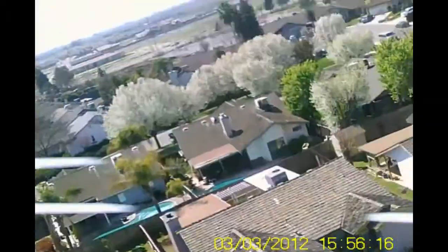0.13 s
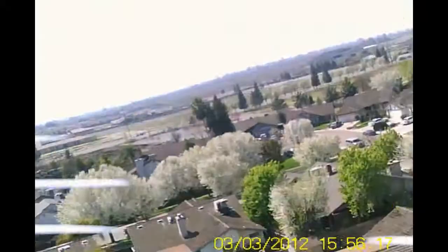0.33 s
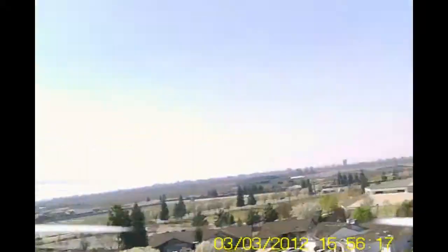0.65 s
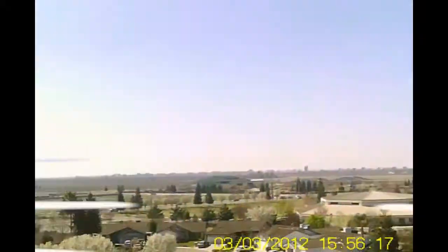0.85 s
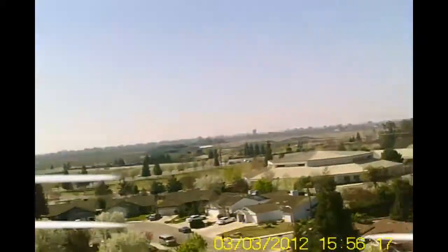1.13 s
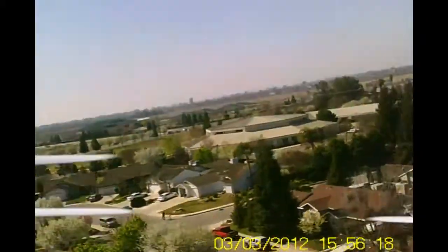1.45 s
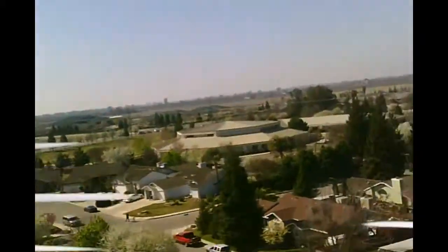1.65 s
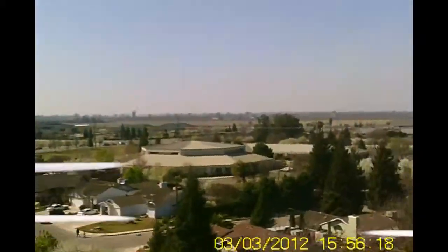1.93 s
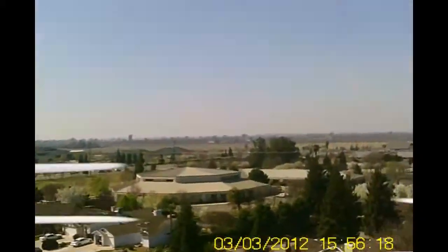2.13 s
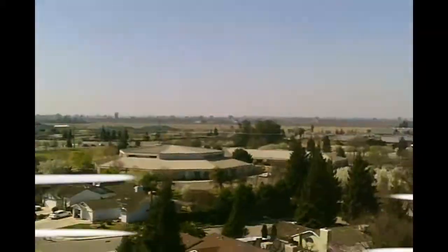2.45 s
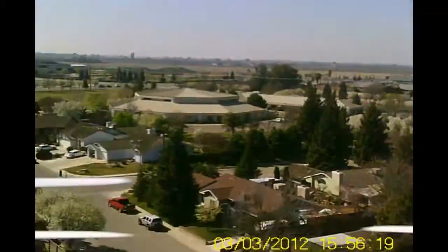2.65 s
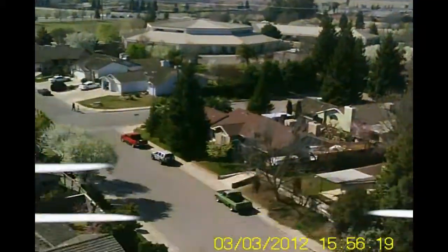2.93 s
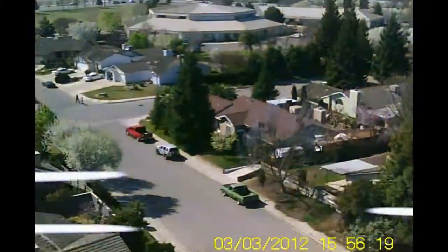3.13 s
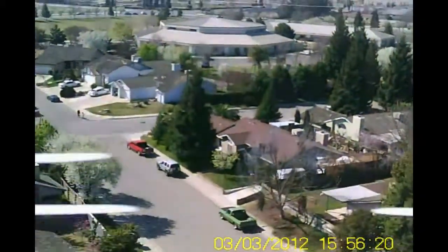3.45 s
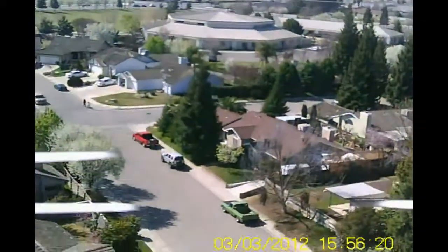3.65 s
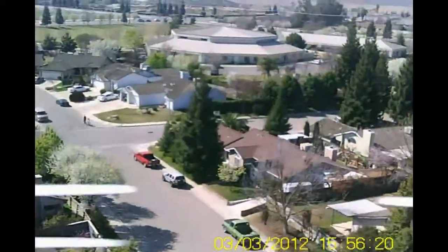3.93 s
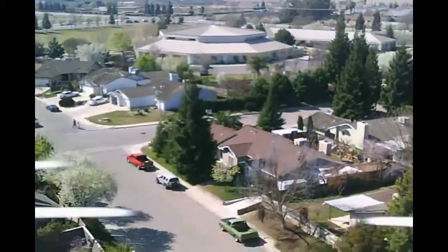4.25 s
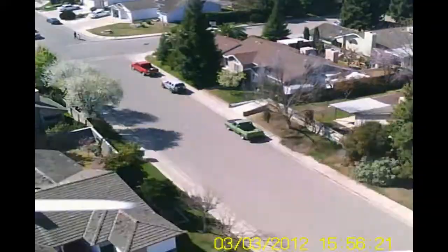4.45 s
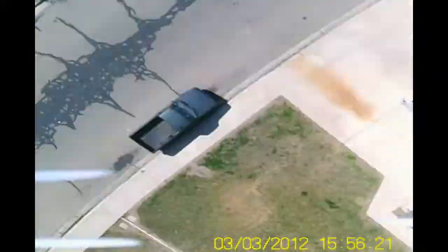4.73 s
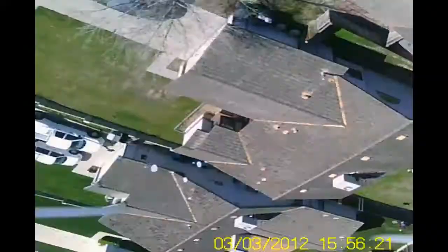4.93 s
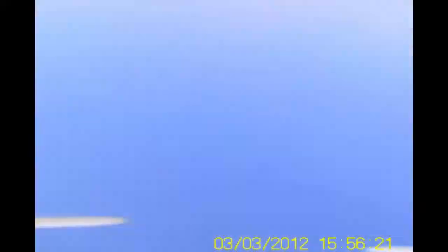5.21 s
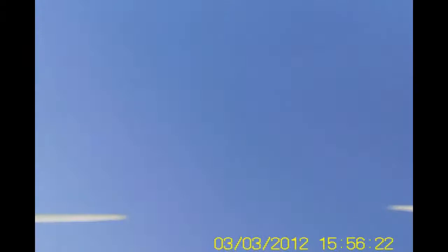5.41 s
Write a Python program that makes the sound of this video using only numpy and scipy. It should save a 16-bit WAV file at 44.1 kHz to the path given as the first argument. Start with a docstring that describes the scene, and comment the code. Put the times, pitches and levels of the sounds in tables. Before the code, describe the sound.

Outdoors, high above houses, a tiny microphone rides on a toy quadcopter, very close to one propeller. From the start a dense, nasal low buzz dominates, with fainter beating drones from the other propellers, plastic rattle, thin gear whine and rasp, brush hiss and a faint fixed high whistle. The buzz rises slightly and is brightest until about 1 second, with some low air buffeting, then eases down by 1.5 seconds. It cruises with small pitch wavers until roughly 4.2 seconds, slightly rougher after 3.3. At about 4.3 it drops abruptly, partly recovers, then sinks further towards 4.8 to 5.0, quieter, while slack gears knock and chatter. From about 5.1 the motors pull again: pitch climbs unevenly to 5.4, blade pulses flutter, strong low wind thumps the microphone, and sharp jolts crack near 5.35 and 5.45. The pitch sags again as it ends around 5.6, still running.

```python
"""A toy quadcopter heard from its own on-board camera, as periodic sources over filtered noise.
It cruises: one propeller's pressure pulses buzz past the microphone, three more thump faintly, four brushed
motors and their gears excite the plastic frame, and the speed controller whistles at its switching rate.
It then throttles back and tumbles: the buzz falls in pitch and level, and slack gears knock and rattle.
Finally it powers up again, with irregular blade pulses and disturbed air buffeting the microphone."""
import sys
import numpy as np
from scipy import signal
from scipy.fft import rfft, irfft
from scipy.io import wavfile
from scipy.ndimage import uniform_filter1d

SR = 44100
rng = np.random.default_rng(int(sys.argv[2]) if len(sys.argv) > 2 else 0)


def transcribe(signal):
    """Save signal, clipped to [-1, 1], as a 16-bit WAV file at the path in sys.argv[1]."""
    frames = np.atleast_2d(signal).T
    limited = np.clip(frames, -1, 1)
    pcm = np.round(limited * 32767).astype(np.int16)
    wavfile.write(sys.argv[1], SR, pcm)


N = 246059
T = np.arange(N) / SR  # t/s

# Buffeting of the microphone, relative spectrum: [f/Hz, level/dB]
BUFFET_SPECTRUM = [(10, -10), (45, 6), (70, -4), (110, 2.5), (160, -3), (220, -10), (340, -11.5),
                   (650, -19), (1000, -21), (2200, -20), (3200, -51), (8000, -58)]
# Swish of the blades, relative spectrum: [f/Hz, level/dB]
SWISH_SPECTRUM = [(12, 21), (25, 5.5), (50, 0), (100, -8), (300, 5.5), (550, -2.5), (720, -3), (950, -2.5),
                  (1200, -1.5), (1550, 3), (2500, -10.5), (3100, -22.5), (6000, -36)]
# Hiss of the motor brushes, relative spectrum: [f/Hz, level/dB]
BRUSH_SPECTRUM = [(2300, -39), (3100, -17.5), (4400, 3.5), (5000, -2.5), (5500, -4.5), (5950, -3.5),
                  (6600, -13), (7500, -5), (8300, -10.5), (9200, -6.5), (9900, -21), (10600, -15),
                  (11800, -30)]
# Dull body of a backlash knock, relative spectrum: [f/Hz, level/dB]
THUD_SPECTRUM = [(150, -30), (350, -4), (520, 7.5), (720, -3), (960, 4), (1400, -7.5), (2500, -16),
                 (4500, -24), (9000, -47)]
# Resonances of the plastic frame: [f/Hz, half bandwidth of each filter section/Hz, level/dB]
FRAME_MODES = [(970, 340, -9), (1791, 245, -1.5), (1962, 342, -2), (2415, 214, -7.5), (3537, 230, -10.5),
               (4057, 210, -9.5)]
# Relative loudness of the tooth mesh as it moves over the frame's resonances: [f/Hz, level/dB]
MESH_RESPONSE = [(2600, -12), (3150, -7), (3550, 8), (3900, 3), (4200, 9), (4450, 6.5), (4700, 5.5),
                 (5100, 3.5)]
# Brief jolts of the frame in the tumble and the recovery: [t/s, change of rattle level/dB]
JOLTS = [(4.627, 5), (4.666, -3), (5.336, 11), (5.442, 5), (5.479, 6)]
# Rough air in the climb, drift, tumble and recovery: [start t/s, rise t/s, start of decay t/s, strength 0-1]
GUSTS = [(-.2, .34, .8, .38), (3.2, .34, 4.3, .18), (4.45, 0.34, 5.3, 0.35), (5.07, .2, 5.31, 0.77),
         (5.08, 0.36, 5.7, 1.0)]
# Throttle: [t/s, mean blade-pass f/Hz of near and opposite propellers, motor torque level/dB]
THROTTLE = [(0, 133, 0), (.85, 136.1, -0.5), (1.5, 131.7, 0), (1.8, 136, .3), (2.45, 132, -0.9),
            (2.85, 134.9, .5), (3.6, 137, 0.67), (4.45, 126.3, 0.3), (4.72, 111, -5), (4.93, 101.5, -4.5),
            (5.06, 97.33, -1.5), (5.35, 111.3, 1), (5.58, 104, 0.5)]
# Two side propellers, trimmed against roll: [t/s, blade-pass f/Hz of one, blade-pass f/Hz of the other]
SIDE_SPEED = [(0, 131.5, 148), (.27, 134.4, 158), (.48, 135.6, 145), (.6, 146.4, 152), (.95, 136.1, 157),
              (1.3, 134.4, 147.8), (1.65, 141.2, 143), (2.2, 134, 138.2), (3.5, 139.4, 141.5),
              (3.95, 148.9, 152.5), (4.3, 150.9, 153.9), (4.5, 113, 127.1), (4.8, 113.5, 102.2),
              (5.05, 109.6, 137.9), (5.2, 113.3, 114.2), (5.58, 112.6, 122.5)]
# Nearest propeller: [t/s, blade-pass f/Hz]
NEAR_SPEED = [(0, 146), (.15, 155.6), (.4, 160.7), (.52, 152.2), (.63, 157.7), (.95, 155.5), (1.17, 148.2),
              (1.33, 138.3), (1.55, 136.4), (1.74, 140.3), (2.08, 139), (2.3, 135.8), (2.55, 136.3),
              (2.85, 140.2), (3.05, 137.3), (3.52, 141.8), (4.05, 135.7), (4.27, 133.3), (4.37, 114.8),
              (4.49, 119.7), (4.77, 86.9), (4.89, 91.16), (5.02, 82.8), (5.18, 98.94), (5.3, 104.5),
              (5.41, 119), (5.58, 103)]

SWITCH_HZ = 3982
FULL_DUTY_HZ = 174  # blade-pass rate with the controller fully on
CRUISE_HZ = 139  # reference blade-pass rate
MESH_ORDER, MOTOR_RATIO = 32, 32 / 11  # gear teeth, and motor turns, per blade pass
CALM_DB, GUST_DB = -47, 28  # buffeting in still air, and its rise in a full gust
GUST_FALL_S = 0.47
CALM_UNEVEN, GUST_UNEVEN, SLACK_UNEVEN = 0.019, .28, 0.26  # scatter of the blade passes
# Reference levels/dB; their slopes with speed (dB per octave) and torque (dB per dB); rise in a full gust/dB
BLADE_DB, BLADE_DB_PER_OCTAVE, BLADE_PER_TORQUE, BLADE_GUST_DB = -23.8, 16, 0.82, 4
RATTLE_DB, RATTLE_GUST_DB = -32, 1.5
TEETH_DB, TEETH_DB_PER_OCTAVE, TEETH_PER_TORQUE, TEETH_GUST_DB = -40, -5.5, 1.8, 2
HISS_DB, HISS_DB_PER_OCTAVE, HISS_PER_TORQUE, HISS_GUST_DB = -43.5, 6.5, 0.27, 2.5
WHISTLE_DB, WHISTLE_PER_TORQUE = -45.5, 3.5  # level at half duty
OVERTONE_DB, OVERTONE_DB_PER_OCTAVE, OVERTONE_PER_TORQUE, OVERTONE_GUST_DB = -67, -21, 1.73, 9
# Gear backlash (0-1): under load, per Hz/s of slowing, and added in a full gust; smoothing time
TIGHT_SLACK, SLACK_PER_HZ_S, GUST_SLACK, SLACK_SMOOTH_S = 0.12, 0.0039, 0.19, 0.27
COAST_DB = 5.5  # loss of pull on a motor whose gears go fully slack
HUNT, HUNT_PER_S = .005, 4  # stabiliser nudging the far propellers: share of speed, rate
STALL_HZ, STALL_DB_PER_OCTAVE = 112, 11  # below this rate the blades lose grip and the buzz fades faster
FLUTTER_DB = 7  # swell and sag of the buzz, per unit of unevenness


def undb(db):
    """Level-to-amplitude relation: decibels to gain."""
    return 10 ** (np.asarray(db) / 20)


def unit(x):
    """Normalisation to rms 1."""
    return x / np.sqrt(np.mean(x ** 2))


def curves(table):
    """Linear interpolation of each column of a time table, sample by sample."""
    t, *columns = np.transpose(table)
    return [np.interp(T, t, column) for column in columns]


def response(points, hz):
    """Frequency response: gain interpolated over log frequency."""
    f, db = np.transpose(points)
    return undb(np.interp(np.log(hz + 1), np.log(f), db))


def colour(x, points):
    """Spectral shaping in the frequency domain, to rms 1."""
    hz = np.arange(N // 2 + 1) * SR / N
    return unit(irfft(rfft(x) * response(points, hz), N))


def ring(drives, modes):
    """Modal resonance: each mode, two peaks in cascade, answers its own drive; the sum has rms 1."""
    out = 0
    for drive, (hz, width, db) in zip(drives, modes):
        b, a = signal.iirpeak(hz, hz / (2 * width), fs=SR)
        once = signal.lfilter(b, a, drive)
        out = out + undb(db) * signal.lfilter(b, a, once)
    return unit(out)


def walk(rate):
    """Band-limited random modulation: smoothed random knots, rate per second, rms 1."""
    knots = rng.standard_normal(int(rate * N / SR) + 2)
    joined = np.interp(T * rate, np.arange(len(knots)), knots)
    return unit(uniform_filter1d(joined, int(SR / rate / 2)))


def spin(hz, wobble):
    """Phase as the integral of frequency: blade-pass angle with a slightly fluttering speed."""
    turns = np.cumsum(hz * (1 + wobble * walk(40))) / SR
    return 2 * np.pi * (turns + rng.random())


def gusts():
    """Turbulence envelope, 0-1: each gust rises, holds and dies away; the strongest prevails."""
    envelopes = []
    for start, rise, end, size in GUSTS:
        shape = np.minimum((T - start) / rise, 1 - (T - end) / GUST_FALL_S)
        envelopes.append(size * np.clip(shape, 0, 1))
    return np.max(envelopes, axis=0)


def air(angle, hz, buffet_db):
    """Aerodynamic noise: swish grows steeply with tip speed; eddies thump on the microphone."""
    grain = rng.standard_normal(N) * (1 + 0.12 * np.cos(angle)) * undb(1.33 * walk(18))
    swish = colour(grain, SWISH_SPECTRUM) * (hz / np.median(hz)) ** 2.1
    buffet = colour(rng.standard_normal(N) * undb(1.5 * walk(120)), BUFFET_SPECTRUM)
    return undb(-34) * swish + undb(buffet_db) * buffet


def controller(hz, torque_db, shaking):
    """Pulse-width modulation: windings sing most at half duty; the octave grows with slowing and torque."""
    duty = np.clip(hz / FULL_DUTY_HZ, 0, 1)
    tone_db = WHISTLE_DB + WHISTLE_PER_TORQUE * torque_db + 4.0 * walk(18)
    octave_db = OVERTONE_DB + OVERTONE_PER_TORQUE * torque_db
    octave_db = octave_db + OVERTONE_DB_PER_OCTAVE * np.log2(hz / CRUISE_HZ)
    octave_db = octave_db + OVERTONE_GUST_DB * shaking + 3.0 * walk(16)
    angle = 2 * np.pi * SWITCH_HZ * T
    tone = np.sin(np.pi * duty) * undb(tone_db) * np.sin(angle)
    octave = undb(octave_db) * np.sin(2 * angle)
    return np.sqrt(2) * (tone + octave)


def backlash(hz):
    """Load reversal: gears go slack shortly after the propeller slows and the motor stops pulling."""
    size = int(SLACK_SMOOTH_S * SR)
    # the shifted window looks backwards, so the slack lags
    slowing = -uniform_filter1d(np.gradient(hz) * SR, size, origin=size // 4)
    return SLACK_PER_HZ_S * np.maximum(slowing, 0)


def chatter(angle, per_blade, per_turn, grain_db):
    """Amplitude modulation of a rubbing contact: uneven, loaded once a blade and once a shaft turn."""
    load = 1 + per_blade * np.cos(angle) + per_turn * np.cos(angle / 2)
    return load / np.sqrt(1 + per_turn ** 2 / 2) * undb(grain_db * walk(500))


def motors(angle):
    """Order harmonics: armatures turn faster than the blades and give wavering overtones."""
    partials = 0
    for blade_angle in angle:
        turn = MOTOR_RATIO * blade_angle + 0.037 * walk(120)
        for k in (4, 5, 6):
            partials = partials + np.sin(k * turn) * undb(4 * walk(25))
    return unit(partials)


def mesh(angle, hz, slack, flutter_hz, runout):
    """Phase modulation of tooth meshing: play blurs the tone, an off-centre gear sways it once a turn."""
    tooth = MESH_ORDER * angle + slack * walk(flutter_hz) + runout * np.sin(angle / 2)
    return np.sin(tooth) * response(MESH_RESPONSE, MESH_ORDER * hz) * undb(1.7 * walk(14))


def gears(angle, rates):
    """Line spectrum and its broadening: each gear sings a thin whine inside a wider rasp."""
    loudness = undb([-2, 1, 0, -5])
    whine = sum(g * mesh(a, hz, slack=.25, flutter_hz=250, runout=.45)
                for g, a, hz in zip(loudness, angle, rates))
    rasp = sum(mesh(a, hz, slack=2.3, flutter_hz=697.8, runout=1.2) for a, hz in zip(angle, rates))
    return undb(-4) * unit(whine) + undb(-5.5) * unit(rasp)


def drive_train(angle, rates, torque_db, pull_db, shaking, slack):
    """Structure-borne sound: rattle and vibration ring the frame, teeth whine, brushes hiss above."""
    rattle_db = RATTLE_DB + torque_db + RATTLE_GUST_DB * shaking
    teeth_db = TEETH_DB + TEETH_PER_TORQUE * pull_db + TEETH_GUST_DB * shaking
    teeth_db = teeth_db + TEETH_DB_PER_OCTAVE * np.log2(rates[0] / CRUISE_HZ)
    hiss_db = HISS_DB + HISS_PER_TORQUE * pull_db + HISS_GUST_DB * shaking
    hiss_db = hiss_db + HISS_DB_PER_OCTAVE * np.log2(np.mean(rates, axis=0) / CRUISE_HZ)
    jolt_db = sum(db * np.exp(-((T - t) / 0.0023) ** 2) for t, db in JOLTS)

    looseness = np.clip(TIGHT_SLACK + slack + GUST_SLACK * shaking, 0, 1)
    knocks = chatter(angle[0], per_blade=0.14, per_turn=looseness, grain_db=0.7 + 4.5 * looseness)
    frame = ring(rng.standard_normal((len(FRAME_MODES), N)) * knocks, FRAME_MODES)
    armatures = undb(-8) * ring([motors(angle)] * len(FRAME_MODES), FRAME_MODES)
    # loose teeth strike harder and shake the whole body
    thud = undb(2) * looseness * colour(rng.standard_normal(N) * knocks, THUD_SPECTRUM)
    rattle = (frame + armatures + thud) * undb(rattle_db + jolt_db + .5 * walk(16))

    tooth_load = chatter(angle[3], per_blade=0.059, per_turn=0.18, grain_db=0.8)
    teeth = gears(angle, rates) * tooth_load * undb(teeth_db)
    scrape = rng.standard_normal(N) * chatter(angle[3], per_blade=0.15, per_turn=0.066, grain_db=1.14)
    hiss = colour(scrape, BRUSH_SPECTRUM) * undb(hiss_db + .3 * jolt_db)
    return rattle + teeth + hiss


def dip(angle, sharpness):
    """Geometric harmonic series: pressure dip of a passing blade, its fundamental of amplitude 1."""
    r = np.clip(sharpness, .01, .9)
    pulse = (1 - r ** 2) / (1 - 2 * r * np.cos(angle) + r ** 2)
    return ((1 - r) / (1 + r) - pulse) / (2 * r)


def blades(angle, sharpness, tip_sharpness, tip_db, mismatch, uneven):
    """Blade-pass pulses: a broad dip with a narrow tip; two blades differ, and every pass varies."""
    size = (1 + mismatch * np.cos(angle / 2)) * np.exp(uneven * walk(130))
    pulse = dip(angle, sharpness) + undb(tip_db) * dip(angle, tip_sharpness)
    highpass = signal.butter(2, 35, "high", fs=SR, output="sos")
    return signal.sosfilt(highpass, np.sqrt(2) * size * pulse)


def far_propellers(angle, uneven, near_db, buffet_db):
    """Blade-pass pulses at a distance: rounder, and thumping harder through disturbed air."""
    far = sum(blades(a, sharpness=.2, tip_sharpness=.6, tip_db=-28, mismatch=.12, uneven=uneven)
              for a in angle)
    return far * (undb(near_db - 26) + undb(buffet_db - 13))


def near_propeller(angle, octaves, uneven):
    """Near-field blade loading: a faster tip cuts a narrower dip, so the buzz brightens with speed."""
    return blades(angle, sharpness=0.54 + 0.037 * octaves, tip_sharpness=0.886,
                  tip_db=-26.5 + 12 * octaves, mismatch=0.12, uneven=uneven)


def scene():
    """Superposition of four geared propellers, their controller and the air they stir."""
    near_hz, = curves(NEAR_SPEED)
    mean_hz, torque_db = curves(THROTTLE)
    # to tilt the craft, the opposite propeller slows by as much as the near one speeds up
    far_hz = [*curves(SIDE_SPEED), 2 * mean_hz - near_hz]
    rates = [near_hz] + [hz * (1 + HUNT * walk(HUNT_PER_S)) for hz in far_hz]
    gust, slack = gusts(), backlash(near_hz)
    shaking = gust ** 2
    buffet_db = CALM_DB + GUST_DB * gust
    uneven = CALM_UNEVEN + GUST_UNEVEN * shaking + SLACK_UNEVEN * slack
    # rough air tugs at every propeller's speed
    angle = [spin(hz, wobble=.001 + .015 * uneven) for hz in rates]

    octaves = np.log2(near_hz / CRUISE_HZ)
    near_db = BLADE_DB + BLADE_DB_PER_OCTAVE * octaves + BLADE_PER_TORQUE * torque_db + BLADE_GUST_DB * gust
    near_db = near_db + STALL_DB_PER_OCTAVE * np.minimum(np.log2(near_hz / STALL_HZ), 0)
    near_db = near_db + FLUTTER_DB * uneven * walk(14)
    # a coasting motor still rattles, but its teeth, brushes and windings fall quiet
    pull_db = torque_db - COAST_DB * slack

    background = air(angle[0], near_hz, buffet_db)
    whistle = controller(near_hz, pull_db, shaking)
    drive = drive_train(angle, rates, torque_db, pull_db, shaking, slack)
    far = far_propellers(angle[1:], uneven, near_db, buffet_db)
    near = undb(near_db) * near_propeller(angle[0], octaves, uneven)
    return (background + whistle + drive + far + near)[None]


def record(dry):
    """Low-pass filtering: the small camera cuts the top above 11.6 kHz."""
    lowpass = signal.ellip(10, .2, 80, 11600, fs=SR, output="sos")
    return signal.sosfilt(lowpass, dry)


dry = scene()
out = record(dry)
transcribe(out)
```